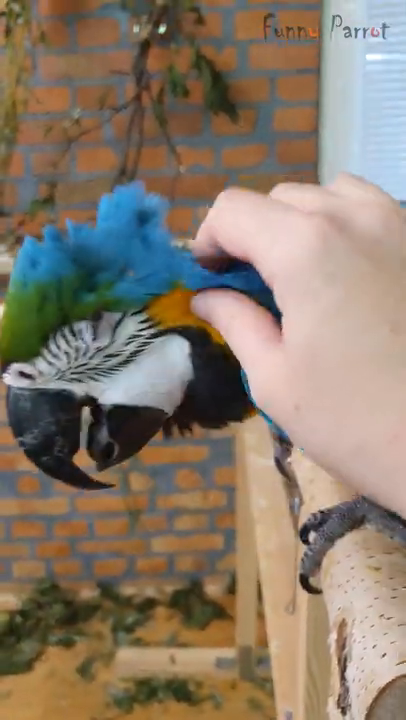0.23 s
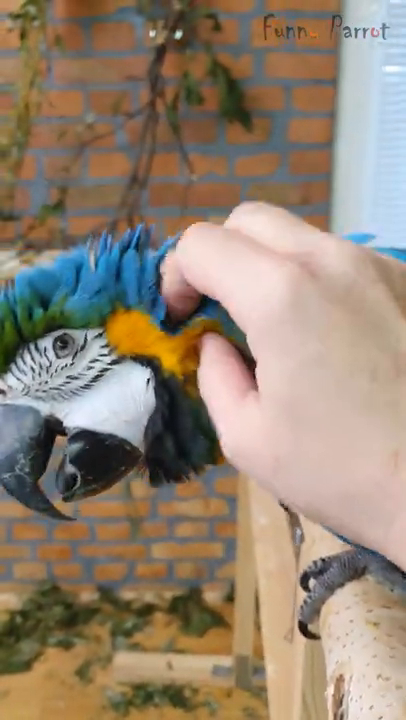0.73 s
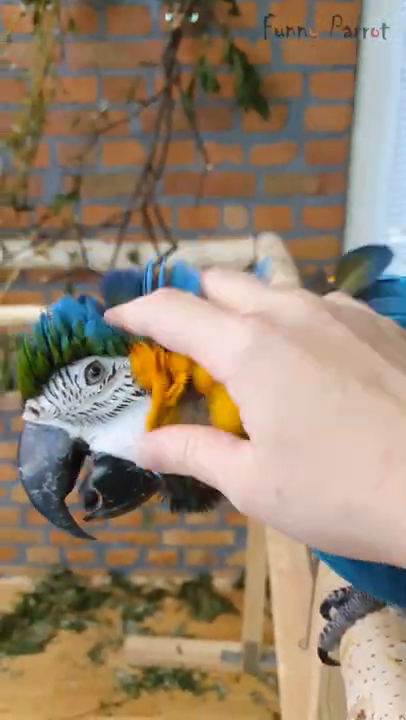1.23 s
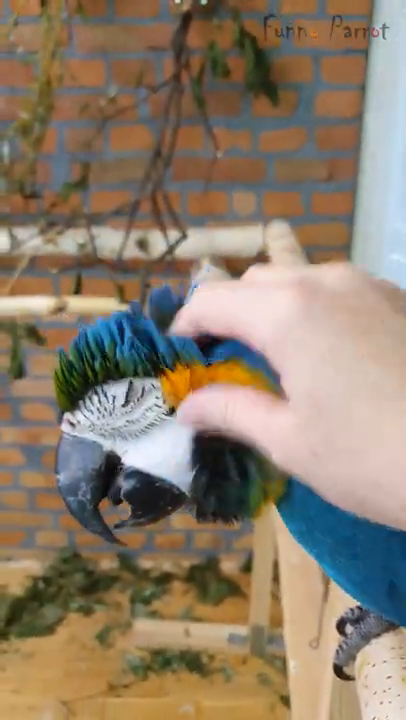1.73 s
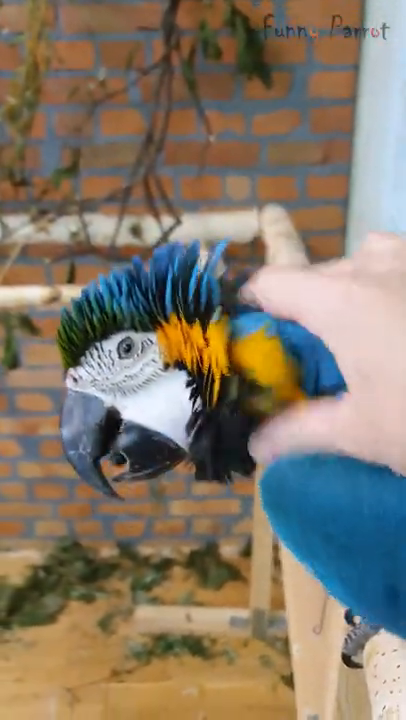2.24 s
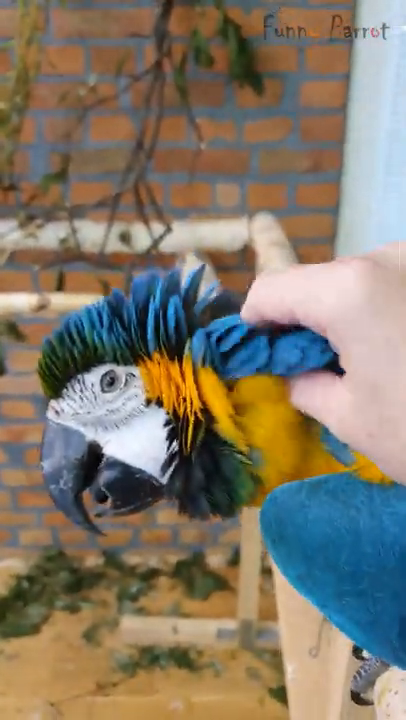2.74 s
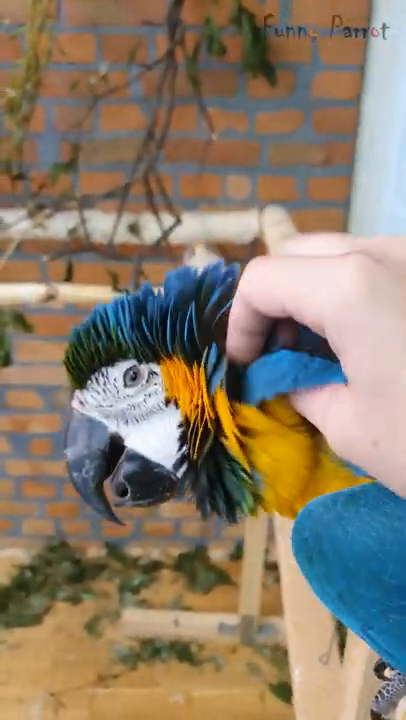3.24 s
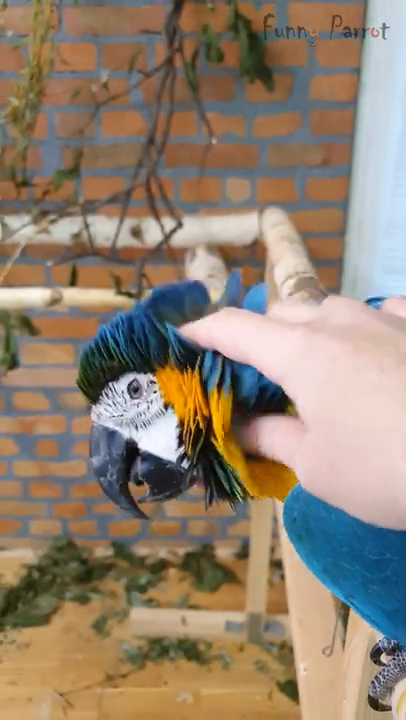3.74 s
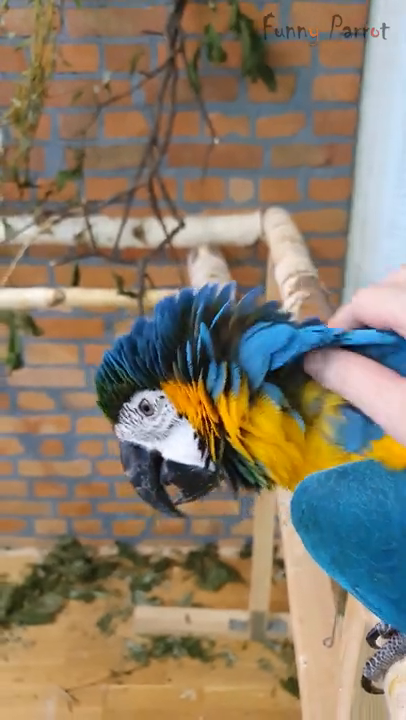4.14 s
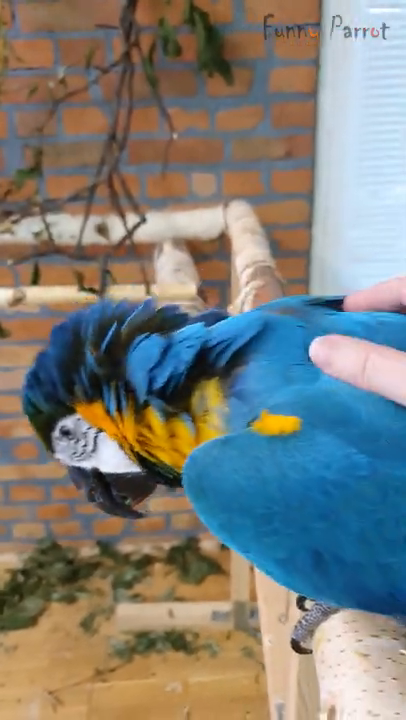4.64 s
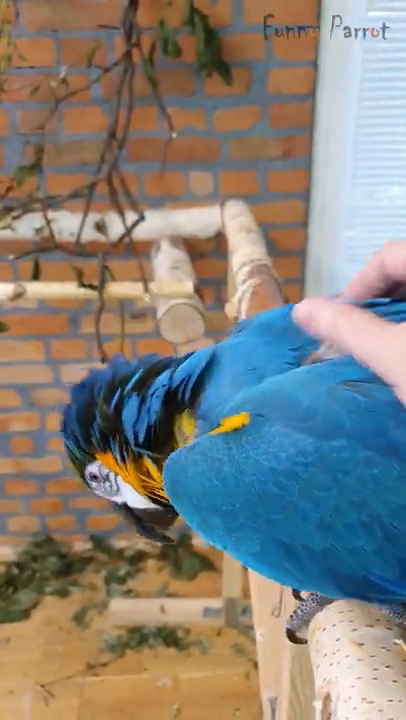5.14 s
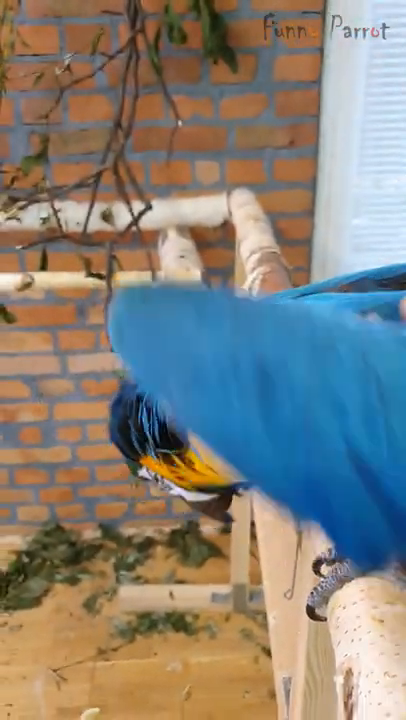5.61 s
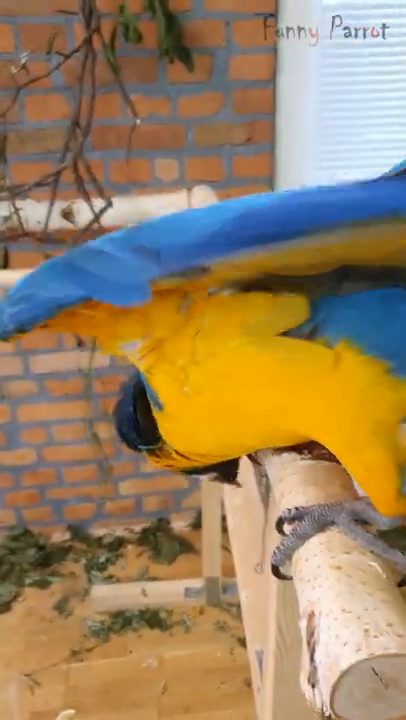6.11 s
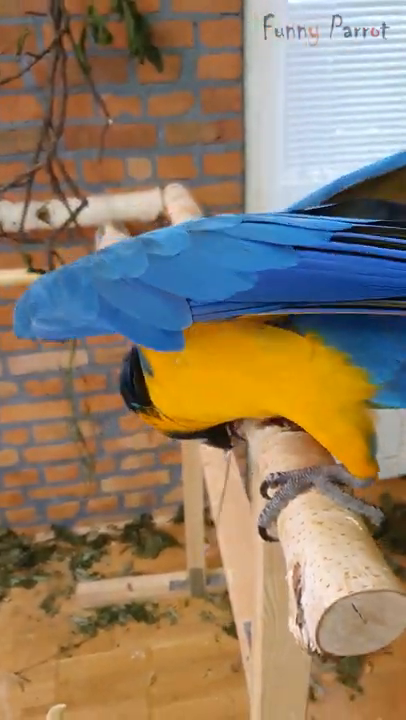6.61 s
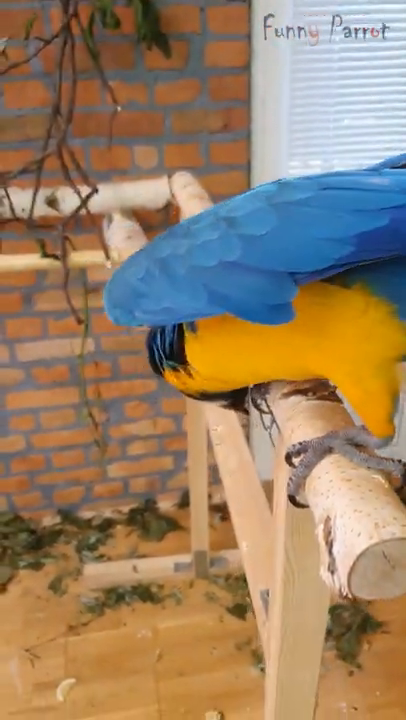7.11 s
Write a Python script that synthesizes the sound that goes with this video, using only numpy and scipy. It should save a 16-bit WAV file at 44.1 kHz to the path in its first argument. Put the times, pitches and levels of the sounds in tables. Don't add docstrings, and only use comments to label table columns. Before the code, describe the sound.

Close, small-camera pickup of a parrot being petted indoors. Faint strokes and occasional tiny wooden taps sit over soft room air and distant hum. Footsteps make the floor boom dully before a loud, gliding, slightly raspy squawk with a short echo. Afterward come hissing feather shakes, a sweeping wing, scuffs and a dense scatter of dry quill clicks, with a short echoing croak before it quiets.

```python
import sys
import numpy as np
from scipy import signal
from scipy.fft import rfft, irfft, next_fast_len
from scipy.io import wavfile
from scipy.ndimage import uniform_filter1d, map_coordinates

SR = 44100
rng = np.random.default_rng(int(sys.argv[2]) if len(sys.argv) > 2 else 0)


def natural_amplitude(level_db):
    exponent = np.asarray(level_db, float) / 20
    return 10 ** exponent


def waveform_to_disk(signal):
    frames = np.transpose(np.atleast_2d(signal))
    scaled = np.clip(frames, -1, 1) * 32767
    samples = np.round(scaled).astype(np.int16)
    wavfile.write(sys.argv[1], SR, samples)


N = 324576


def unit(x):
    return x / np.sqrt(np.mean(x ** 2) + 1e-20)


def along(points, hz):
    f, v = np.transpose(points)
    return np.interp(np.log(hz + 1), np.log(f + 1), v)


def curves(rows):
    s, *cols = np.transpose(rows)
    return [np.interp(np.arange(N) / SR, s, c) for c in cols]


def wobble(rate):
    knots = rng.standard_normal(int(N * rate / SR) + 4)
    return map_coordinates(knots, [np.arange(N) * rate / SR])


def swell(s, db, rise_s, hold_s, fall_s):
    t = np.arange(N // 44 + 2) * 44 / SR
    before = np.maximum((s - t) / max(rise_s, .005), 0)
    after = np.maximum((t - s - hold_s) / max(fall_s, .005), 0)
    return db - 20 * (before + after) ** 1.5


def summed(levels_db):
    total = np.sqrt(np.sum(natural_amplitude(levels_db) ** 2, axis=0))
    return np.interp(np.arange(N) / 44, np.arange(N // 44 + 2), total)


def filtered(x, response):
    size = x.shape[-1]
    m = next_fast_len(size + SR // 8, real=True)
    return irfft(rfft(x, m) * response(np.fft.rfftfreq(m, 1 / SR)), m)[..., :size]


def resonances(modes):
    def response(f):
        total = 0
        for k, (c, w, db) in enumerate(modes):
            total = total + (-1) ** k * natural_amplitude(db) * 1j * f * w / (c * c - f * f + 1j * f * w)
        return total
    return response


def narrow(hz, width, size):
    f = np.fft.rfftfreq(size, 1 / SR)
    peak = 1 + (2 * (f - hz) / width) ** 2
    return unit(irfft(rfft(rng.standard_normal(size)) / peak, size))


def grit(grit_db, patchy_db):
    grains = natural_amplitude(grit_db * rng.standard_normal((2, N)).clip(-3, 2.4))
    z = signal.stft(rng.standard_normal((2, N)) * grains, nperseg=256)[2]
    field = uniform_filter1d(rng.standard_normal(z.shape[1:]), size=5, axis=0)
    field = uniform_filter1d(field, size=12, axis=1)
    return signal.istft(z * natural_amplitude(patchy_db * unit(field)), nperseg=256)[1][:, :N]


def rush(pair, gain):
    # pitch_hz, likeness (1 = the same)
    likeness = [(60, 0.96), (130, 0.96), (290, 0.87), (640, 0.67), (1400, 0.13), (3000, 0)]

    def share(hz):
        return np.sqrt((1 + np.clip(along(likeness, hz), -1, 1) * [[1], [-1]]) / 2)
    mid, side = filtered(pair, lambda hz: gain(hz) * share(hz))
    return unit(np.array([mid + side, mid - side]))


def room(x, stretch):
    # pitch_hz, fall_s
    echo_fall = [(300, 1), (1500, 0.7), (3500, 0.74), (6000, 0.68), (12000, 0.15)]
    hz, t, z = signal.stft(rng.standard_normal((2, SR)), SR, nperseg=256)
    decay = natural_amplitude(-60 * t / (stretch * along(echo_fall, hz)[:, None]))
    decay = decay * (1 + 0.13 * natural_amplitude(-60 * t / 0.084))
    tail = signal.istft(z * decay, SR, nperseg=256)[1]
    first, last = np.flatnonzero(x)[[0, -1]]
    answer = signal.fftconvolve(x[None, first:last + 1], tail / np.linalg.norm(tail[0]), axes=1)
    return np.pad(answer, ((0, 0), (first + round(.003 * SR), N)))[:, :N]


def background():
    # pitch_hz, width_hz, level_db (per Hz)
    hum_lines = [(76.9, 4.2, -1), (121.5, 22, -4), (204, 9.2, -11.5), (298.5, 4.2, -6.5), (353.1, 28, -6),
                 (441.2, 6.2, -5), (845, 38, -28.5), (1676, 220, -41)]
    # pitch_hz, level_db (per Hz)
    air_colour = [(15, -54.5), (25, -38), (108, 0), (242, -8), (354, -5.5), (405, -16.5), (451, -14),
                  (545, -20.5), (840, -25.5), (1040, -28), (1740, -24.5), (3080, -49.5), (4490, -29.5),
                  (11300, -37.5), (16000, -70.5)]

    def lines(f):
        return sum(natural_amplitude(db) / (1 + (2 * (f - hz) / width) ** 2) for hz, width, db in hum_lines)
    level_db = -63 + 1.4 * wobble(4.6)
    phase = 2 * np.pi * np.cumsum(119.2 + 1.21 * wobble(7.3)) / SR
    mains = natural_amplitude(level_db) * (np.sin(phase) + 0.69 * np.sin(3 * phase))
    machine = natural_amplitude(-62.5) * rush(rng.standard_normal((2, N)), lines)
    air = natural_amplitude(-64.5) * rush(rng.standard_normal((2, N)), lambda hz: natural_amplitude(along(air_colour, hz)))
    return (machine + air + mains) * natural_amplitude([[-.3], [.3]])


def boards():
    # start_s, peak_db, rise_s (20 dB), hold_s, fall_s (20 dB)
    footsteps = [(.72, -68, .04, .13, .06), (1.18, -72, .25, .05, .08), (2.46, -63, .07, .02, .2),
                 (2.7, -76, .1, .3, .1), (3.12, -43, .05, .09, .14), (3.45, -48, .3, .1, .2),
                 (3.62, -50.5, .1, .07, .06), (3.82, -56, .08, .15, .16), (4.22, -72, .1, .27, .1),
                 (5.42, -55, .05, .07, .1), (5.68, -61, .1, .1, .13), (6.05, -77, .2, 1.1, .1)]
    # start_s, level_db, pitch_hz, width_hz, length_s
    scuffs = [(1.7, -71, 2370, 460, 0.057), (2.032, -65.5, 1860, 2000, 0.067),
              (2.262, -63, 1700, 2700, 0.045), (2.256, -64.5, 1250, 980, 0.16),
              (3.073, -70, 1400, 3600, 0.14), (3.079, -49, 202, 45, 0.13), (3.11, -55.5, 525, 60, 0.083),
              (3.172, -57.5, 513, 57, 0.052), (3.08, -66, 670, 280, 0.13), (3.5, -49, 98, 27, 0.093),
              (4.171, -57.5, 388, 510, 0.17), (4.403, -71, 280, 372, 0.17), (5.09, -63, 3500, 900, 0.096),
              (5.38, -67, 3740, 1300, 0.27), (5.818, -50, 1070, 1200, 0.12),
              (6.217, -45.5, 1970, 310, 0.038), (6.234, -64, 2600, 770, 0.04),
              (5.836, -50, 1600, 760, 0.032), (5.878, -47, 1600, 400, 0.045),
              (5.894, -53, 5600, 1500, 0.018), (4.89, -71.5, 3000, 900, 0.13), (4.1, -66, 4100, 600, .1),
              (5.1, -66.5, 2120, 330, 0.15), (5.13, -59.5, 4000, 1500, 0.11), (2.378, -74, 930, 900, 0.072),
              (6.784, -63.5, 740, 190, 0.036), (7.07, -75, 610, 250, .14), (4.3, -61.5, 260, 320, 0.24),
              (4.551, -66, 260, 314, 0.21), (6.49, -54.5, 780, 340, 0.081), (4.69, -60.5, 3700, 1200, .15),
              (4.6, -62, 1980, 600, .25), (5.28, -64.5, 3950, 1500, 0.11), (5.29, -70, 2150, 300, .1),
              (4.99, -70, 2170, 400, .07), (4.97, -73, 3440, 700, .09), (6.99, -58, 2200, 400, .22),
              (6.97, -58, 1400, 250, .14), (6.66, -66, 540, 120, .18)]
    phase = 2 * np.pi * np.cumsum(41.5 + 1.095 * wobble(11.0)) / SR
    treading = summed([swell(*step) for step in footsteps]) * natural_amplitude(2.7 * wobble(22))
    swaying = natural_amplitude(-86 + 4 * wobble(8.9))
    out = 1.03 * (treading + swaying) * (np.sin(phase) + 0.22 * np.sin(2 * phase + 1))
    t = np.arange(SR // 4) / SR
    for s, db, hz, width, length in scuffs:
        shape = np.sin(np.pi * np.clip(t / length, 0, 1)) ** 2
        out[round(s * SR):][:len(t)] += natural_amplitude(db) * shape * narrow(hz, width, size=len(t))
    return out


def taps():
    # start_s, peak_db, pitch_hz
    claw_taps = [(0.242, -61, 796), (1.954, -84, 848), (2.04, -53.5, 930), (2.589, -58, 880),
                 (2.624, -63.5, 867), (3.235, -59, 920), (3.816, -69, 866), (6.487, -44, 844),
                 (6.756, -53.5, 786)]
    out, t = np.zeros(N + SR), np.arange(SR // 10) / SR
    for s, db, hz in claw_taps:
        note = 0
        for ratio, level_db, t60 in [(1, 7, 0.017), (1.9, -5, 0.0081), (2.8, -4, 0.0059)]:
            note = note + natural_amplitude(level_db - 60 * t / t60) * np.sin(2 * np.pi * hz * ratio * t)
        scrape = 0.62 * natural_amplitude(-60 * t / 0.028) * rng.standard_normal(len(t))
        out[round(s * SR):][:len(t)] += natural_amplitude(db + 3.0) * (note + scrape)
    return filtered(out[:N], resonances([(1420, 1470, 0)]))


def croak():
    # start_s, pitch_hz, effort_db
    croak_path = [(6.853, 699, -62), (6.856, 703, -47), (6.8625, 710, -49), (6.8635, 716, -33),
                  (6.875, 720, -36.5), (6.915, 715, -41), (6.945, 688, -52), (7.0, 710, -68)]
    # pitch_hz, width_hz, level_db
    throat = [(2090, 200, 2), (2720, 520, -2.5), (3720, 130, 3), (3940, 120, 2.5), (4400, 200, -2.5),
              (4730, 250, -2), (5240, 340, -3.5), (7320, 720, -7), (8900, 990, -14)]
    # pitch_hz, width_hz, level_db
    chest = [(1405, 200, 0), (920, 150, -19.5)]
    start, out = round(croak_path[0][0] * SR), np.zeros(N)
    hz, effort_db = np.array(curves(croak_path))[:, start:]
    turns = np.cumsum(hz * (1 + 0.031 * wobble(300)[start:])) / SR
    pulses = unit(np.exp(40 * (np.cos(2 * np.pi * turns) - 1)))
    puffs = unit(rng.standard_normal(N)[start:] * np.exp(2.0 * np.cos(2 * np.pi * turns)))
    source = (effort_db > -68) * natural_amplitude(effort_db + 8) * (.3 * pulses + puffs)
    late = np.roll(filtered(source, resonances(chest)), round(0.024 * SR))
    out[start:] = natural_amplitude(3.5) * filtered(source, resonances(throat)) + natural_amplitude(2.0) * late
    return out


def squawk():
    # start_s, pitch_hz, effort_db, rasp_db
    squawk_path = [
        (4.074, 1690, -68, -7.5),
        (4.097, 1580, -34.5, -15),
        (4.137, 2045, -32, -14),
        (4.165, 2018, -29, 6.5),
        (4.197, 1789, -29, 1),
        (4.232, 1842, -25.5, -3),
        (4.272, 1809, -18, -6),
        (4.31, 1786, -22.5, -6),
        (4.34, 1770, -80.5, -6.5),
    ]
    # multiple of the pitch, level_db, share of the rasp
    overtones = [(1, -3, 0.11), (2, 3, 0.37), (3, -22, 0.93), (4, -28, 0.7), (5, -34, 0.5), (6, -43, .5),
                 (7, -37.5, .5)]
    hz, effort_db, rasp_db = curves(squawk_path)
    on, out = effort_db > -68, np.zeros(N)
    phase = 2 * np.pi * np.cumsum(hz * (1 + 0.0032 * wobble(150)))[on] / SR
    blur = wobble(500)[on]
    tone = 0
    for k, db, share in overtones:
        strength = natural_amplitude(db + share * rasp_db[on]) * (1 + 1.4 * share ** 2 * blur)
        tone = tone + strength * np.sin(k * phase)
    breath = filtered(rng.standard_normal(N)[on], resonances([(2900, 3200, 0.0071), (5900, 700, 3)]))
    out[on] = natural_amplitude(effort_db[on]) * (1.27 * tone + natural_amplitude(-28.5) * breath)
    return out


def snaps():
    # start_s, peak_db, pitch_hz, left_right_db
    quill_snaps = [(4.076, -58, 3160, 3.5), (5.145, -52, 3700, 6), (5.6964, -42, 3600, -1),
                   (6.1201, -33, 3300, -1), (6.1864, -31, 4300, -1), (6.1874, -33, 4800, -1),
                   (6.2005, -35, 4000, 1), (6.222, -33, 2300, 0), (6.2716, -33, 3600, 3),
                   (6.3404, -34, 3600, 5), (6.4102, -31, 3900, 0), (6.459, -39, 3800, 0),
                   (6.4812, -31, 3700, 1), (6.488, -27, 2700, -5), (6.5332, -33, 4300, -1),
                   (6.6013, -38, 4700, 2), (6.6683, -37, 3000, -4), (6.6766, -39, 4700, 1),
                   (6.6993, -30, 3900, 1), (6.7769, -33, 3600, 2), (6.827, -43, 4200, 2),
                   (6.8556, -37, 2500, 0), (6.9241, -25, 3700, -4), (7.0044, -34, 3700, 3),
                   (7.0563, -43, 3600, 2), (7.0859, -35, 3600, 0), (7.1395, -53, 3700, 0),
                   (7.161, -49, 3500, 0)]
    # start_s, peak_db, pitch_hz, left_right_db
    barb_ticks = [(2.302, -53, 6500, -9), (2.389, -60, 1500, 0), (2.5586, -65, 9500, -2),
                  (3.041, -57, 2300, 4), (3.1951, -67, 8000, -4), (3.3636, -62, 3800, -2),
                  (3.7481, -64, 9500, 2), (3.7553, -59, 7000, 2), (3.7928, -64, 9500, -2),
                  (4.5198, -45, 9500, -8), (4.7909, -46, 10500, 3), (4.8019, -42, 7300, -1),
                  (5.0029, -56, 1900, -2), (5.0029, -63, 8300, -2), (5.0629, -60, 4600, 1),
                  (5.7644, -35, 7500, -11), (5.9599, -37, 6800, -8), (5.9712, -39, 6500, -5),
                  (6.1201, -44, 10000, -1), (6.488, -35, 7000, -5), (6.6993, -38, 6500, 1),
                  (6.7505, -43, 5000, 1), (6.827, -50, 7500, 2), (6.8637, -34, 7500, -4),
                  (6.979, -47, 10000, -2), (7.0563, -45, 6000, 2), (7.0565, -56, 11000, 2),
                  (7.1395, -66, 7500, 0), (7.3127, -61, 7500, 1)]
    out, t = np.zeros((2, N + SR)), np.arange(SR // 100) / SR
    rattle = []
    for k in range(8):
        s = 5.8795 + (k + rng.uniform(-.35, .35)) * .0015
        rattle.append((s, -32 - .4 * (k - 3) ** 2, 6000 * rng.uniform(.8, 1.2), -4))
    flicks = [(*q, .00024, .05) for q in quill_snaps]
    flicks += [(*q, .9 / q[2], .25) for q in barb_ticks + rattle]
    for s, db, hz, pan_db, rise_s, crack in flicks:
        shape = t / rise_s * np.exp(1 - t / rise_s)
        flick = shape * (np.sin(2 * np.pi * hz * t) + crack * rng.standard_normal(len(t)))
        sides = natural_amplitude([[pan_db / 2], [-pan_db / 2]])
        out[:, round((s - rise_s) * SR):][:, :len(t)] += natural_amplitude(db + 3) * sides * flick
    return filtered(out[:, :N], resonances([(5000, 14000, 0)]))


def feathers():
    # start_s, strength_db, hold_s, depth_db
    fingers = [(.02, -89, 0.18, -16), (.2, -82, 0.086, -1), (.51, -82, 0.21, 0.5), (.82, -84, 0.052, 1.5),
               (.94, -87, 0.05, 1), (1.06, -85, 0.049, -2), (1.19, -78.5, 0.014, -3), (1.3, -91, 0.078, 5),
               (1.41, -79, 0.037, 0.5), (1.54, -87, 0.064, 2.5), (1.639, -96, .04, 7),
               (1.76, -77, 0.014, -0.5), (1.87, -79, .05, -2), (1.95, -73, 0.034, -2.5),
               (2.05, -72.5, 0.035, -5.5), (2.15, -82, 0.061, -0.5), (2.275, -63.5, 0.063, 0),
               (2.44, -82, 0.46, 2.5), (3.02, -80, 0.07, 1.5), (3.2, -87, 0.081, -1),
               (3.345, -79, 0.04, -3), (3.48, -84, 0.055, -4), (3.598, -101, 0.087, -4),
               (3.74, -77, 0.039, -7), (3.859, -84, 0.044, -1.5), (4.0, -80, 0.043, -9)]
    # start_s, strength_db, rise_s (20 dB), fall_s (20 dB), depth_db
    shakes = [(4.185, -56, .07, .15, 0), (4.405, -53, .1, .08, 0), (4.525, -58, .09, .14, 0),
              (4.785, -62, .09, .065, -8), (4.935, -69, .1, .08, -1), (5.18, -66, .14, .07, -5),
              (5.315, -68, .065, .075, -6), (5.608, -50, .055, .13, -3), (5.845, -62, .03, .07, 11),
              (5.897, -54, .05, .04, 5), (6.008, -56, .05, .04, 1), (6.06, -57, .06, .08, -2),
              (6.166, -54, .15, .15, -4), (6.235, -60, .04, .14, 9), (6.318, -54, .15, .14, 1),
              (6.512, -60, .05, .2, 7), (6.686, -59, .15, .1, 1), (6.866, -58, .012, .05, -6),
              (6.9, -64, .04, .17, -9), (7.312, -81, .01, .016, 0)]
    # start_s, strength_db, depth_db, skin_db
    wing = [
        (5.36, -81.5, 3.5, 0),
        (5.55, -77, -0.5, -1),
        (5.66, -58, -1, -6.5),
        (6.02, -61, 3, 3.5),
        (6.12, -61.5, 1.5, -20),
        (6.45, -57, 4, -19),
        (6.53, -57, -4, -12),
        (6.8, -74, 12.5, 7.5),
        (6.86, -79, 15, 15),
    ]
    # pitch_hz, level_db (per Hz)
    hiss = [(5500, -33.5), (8000, -3), (9200, -1.5), (11000, -0.5), (12500, -3), (16000, -9)]
    brush = [(2400, -34), (3600, 3), (5000, 1), (6800, -1.5), (7800, -10), (10000, -37)]
    swish = [(800, -37), (1300, -5.5), (2100, 2.5), (2800, -0.5), (3400, -8.5), (4800, -39)]
    rub = [(130, -19.5), (300, -8.5), (550, -8.5), (900, 0.5), (1200, -5), (1800, -20.5)]
    strokes = [(s, db - 2, 0.033, held, 0.076, depth - 2) for s, db, held, depth in fingers]
    strokes += [(0, -104, 1, N / SR, 1, 13)]
    strokes += [(s, db, rise, 0, fall, depth) for s, db, rise, fall, depth in shakes]
    level_db = np.array([swell(*stroke[:-1]) for stroke in strokes])
    ticks = np.minimum(np.arange(level_db.shape[1]) * 44, N - 1)
    wing_db, wing_depth_db, skin_db = np.array(curves(wing))[:, ticks]
    columns = np.transpose(strokes)[..., None]
    peak_db, deep_db = columns[1], columns[-1] + 0 * level_db
    depth_db = np.vstack([deep_db, wing_depth_db])
    rub_db = np.vstack([-5 + 0.22 * deep_db - 0.96 * (peak_db + 65.0).clip(0), skin_db])
    folded = (wing_db == wing[0][1]) | (wing_db == wing[-1][1])
    level_db = np.vstack([level_db, wing_db - 60 * folded])
    above = [3.5, 6.5 + 0.75 * depth_db, depth_db + 5.0, rub_db]
    barbs = grit(grit_db=5.0, patchy_db=1.5)
    stroke = 0
    for colour, db in zip([hiss, brush, swish, rub], above):
        stroke = stroke + summed(level_db + db) * rush(barbs, lambda hz: natural_amplitude(along(colour, hz)))
    return natural_amplitude(1.2 * wobble(25) + 0.2 * wobble(99)) * stroke * natural_amplitude([[-.6], [.6]])


def scene():
    call = squawk()
    far = (natural_amplitude(-14) * call + natural_amplitude(-1) * room(call, .84)) * natural_amplitude([[-.8], [.8]])
    rasp, wood, quills = croak(), taps(), snaps()
    far += natural_amplitude(-5) * rasp + room(rasp, .66)
    near = quills + wood + room(natural_amplitude(-2.0) * quills[0] + wood, .45)
    plumage = feathers()
    near += natural_amplitude(-.5) * plumage + natural_amplitude(-11) * room(plumage[0], .7)
    return far + near + boards() + background()


def top_cut(x):
    return signal.sosfilt(signal.butter(12, 16440, fs=SR, output="sos"), x)


def record(dry):
    # pitch_hz, level_db (per bin)
    faintest = [(11700, -150), (11900, -116), (14000, -113), (14600, -109.5), (15790, -109), (15900, -40)]
    hz, _, z = signal.stft(dry, SR, nperseg=2048)
    power = (np.abs(z) ** 2).mean(axis=0)
    bands = power[:-1].reshape(32, 32, -1).mean(axis=1).repeat(32, axis=0)
    z[:, :-1] *= bands > natural_amplitude(2 * along(faintest, hz[:-1]))[:, None]
    strips = power[76:716].reshape(32, 20, -1).mean(axis=1)
    below = np.maximum(np.roll(strips, 1, axis=0), np.roll(strips, 2, axis=0))
    below = below * (hz[76:716:20, None] > 4000)
    hidden_under = np.maximum(natural_amplitude(2 * -52) * strips.max(axis=0), natural_amplitude(2 * -32) * below)
    z[:, 76:716] *= (strips > hidden_under).repeat(20, axis=0)
    return top_cut(signal.istft(z, SR, nperseg=2048)[1][:, :N])


dry = scene()
out = record(dry)
waveform_to_disk(out)
```